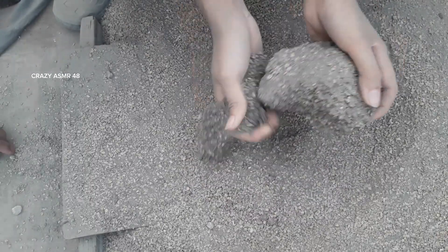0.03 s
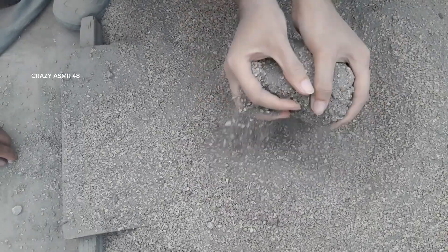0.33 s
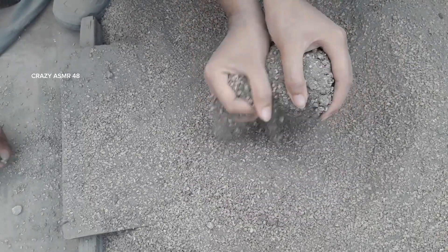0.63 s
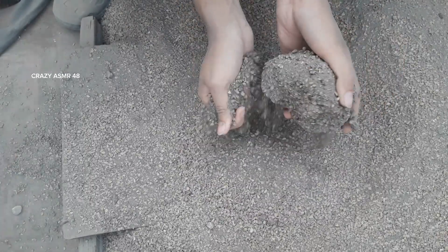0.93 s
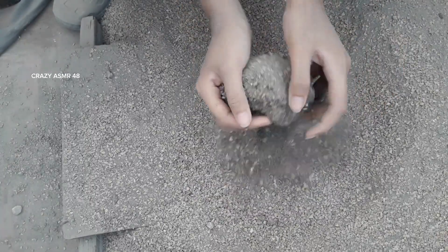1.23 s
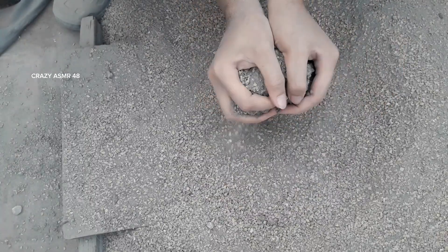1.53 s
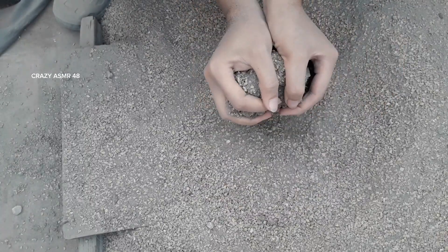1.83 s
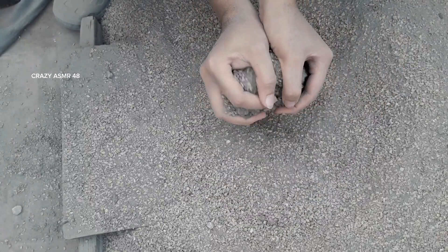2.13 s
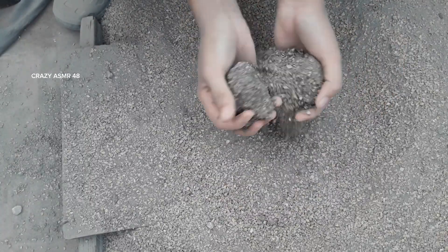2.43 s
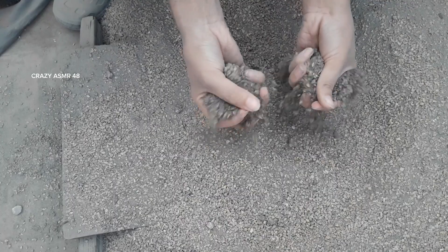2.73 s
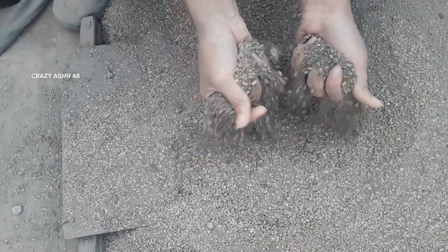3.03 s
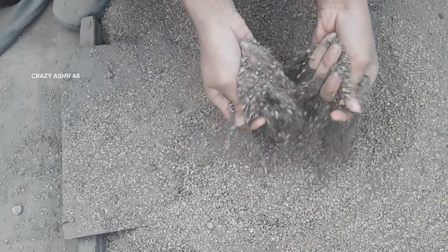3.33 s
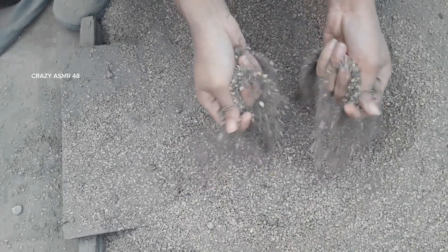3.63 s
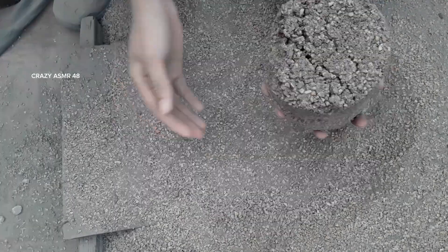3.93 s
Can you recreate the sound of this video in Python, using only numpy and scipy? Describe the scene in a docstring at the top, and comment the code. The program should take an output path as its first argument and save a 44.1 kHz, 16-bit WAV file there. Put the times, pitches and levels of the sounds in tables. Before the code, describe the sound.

A lump of dry sand crunches and snaps between two hands, close up. It gives with a few hollow knocks, then is ground down in the fists as grains trickle onto sand, over a faint low hum.

```python
"""A gritty snap, close up: two hands break and crumble a lump of dry sand.
Bonds between grains snap in bright runs, the lump gives with hollow knocks inside the closed palms,
then the fists grind it down. Loose grains trickle onto a sand bed and fine dust sizzles.
The sand cuts off just before the end; a low machine hum and faint hiss go on."""
import sys
import numpy as np
from scipy import signal
from scipy.fft import rfft, irfft
from scipy.io import wavfile

SR = 44100
rng = np.random.default_rng(int(sys.argv[2]) if len(sys.argv) > 2 else 0)


def inscribe(sig):
    """Save sig as 16-bit PCM at rate SR to the path in sys.argv[1].

    A 1-D sig is mono; a 2-D sig holds one channel per row.
    Samples are clipped to [-1, 1] before scaling.
    """
    pcm = np.round(np.clip(np.atleast_2d(sig).T, -1, 1) * 32767)
    wavfile.write(sys.argv[1], SR, pcm.astype(np.int16))


N = 176400
T = np.arange(N) / SR


def amp(db):
    """Decibels to gain."""
    return 10 ** (np.asarray(db) / 20)


def unit(x):
    """Scale to rms 1."""
    return x / np.sqrt(np.mean(x ** 2) + 1e-20)


def add(mix, start_s, sound):
    """Mix a sound in at start_s."""
    part = mix[round(start_s * SR):][:len(sound)]
    part += sound[:len(part)]


def drift(hz):
    """Smooth random motion up to about hz, rms 1."""
    rolloff = 1 + (np.fft.rfftfreq(N, 1 / SR) / hz) ** 4
    return unit(irfft(rfft(rng.standard_normal(N)) / rolloff, N))


def colour(x, points, size=4096):
    """Minimum-phase filter of unit energy; points set the spectral shape."""
    hz, db = np.transpose(points)
    bins_hz = abs(np.fft.fftfreq(size, 1 / SR))
    log_gain = np.log(amp(np.interp(np.log(bins_hz + 1), np.log(hz), db)))
    response = np.exp(np.conj(signal.hilbert(log_gain)))
    taps = np.fft.ifft(response).real[:size // 2]
    return signal.oaconvolve(x, taps / np.linalg.norm(taps))[:N]


def contour(points):
    """Gain curve through (time, dB) points."""
    return amp(np.interp(T, *np.transpose(points)))


def effort(strokes, fall_db):
    """Power-summed envelope of strokes that rise, hold, then lose fall_db per release time."""
    power = np.zeros(N)
    for start, rise, hold, release, db in strokes:
        attack = np.clip((T - start) / rise, 0, 1)
        released_s = np.maximum(T - start - rise - hold, 0)
        power += (amp(db - fall_db * released_s / release) * attack) ** 2
    return np.sqrt(power)


def grains(per_s, spread_db, clump_db, clump_hz, dust):
    """Clicks of uneven size over a share of fine dust, swelling in clumps; rms 1."""
    size = amp(spread_db * np.minimum(rng.exponential(1, N), 4))
    clicks = unit(size * rng.choice([-1, 1], N) * (rng.random(N) < per_s / SR))
    grit = clicks + dust * rng.standard_normal(N)
    clumps = amp(clump_db * np.clip(drift(clump_hz), -2, 2))
    return unit(grit * clumps)


def scatter(x, t60_s, wet_db):
    """Each grain sheds a short hiss of finer particles."""
    decay = amp(-60 * T[:SR // 10] / t60_s) ** 2
    tail_power = abs(signal.oaconvolve(x ** 2, decay / decay.sum())[:N])
    tail = np.sqrt(tail_power) * rng.standard_normal(N)
    return (x + amp(wet_db) * tail) / np.hypot(1, amp(wet_db))


# fist squeezes: t/s, rise/s, hold/s, release/s, level/dB
SQUEEZES = [(.05, 0.011, .01, 0.088, -31.5), (.49, 0.036, 0.017, 0.14, -26),
            (.765, 0.049, 0.089, 0.072, -18), (2.118, 0.02, 0.005, 0.086, -20),
            (2.24, 0.022, .03, .08, -32.5), (2.55, 0.17, 0.031, 0.072, -27),
            (2.70, 0.069, 0.031, 0.22, -17.5), (2.84, 0.048, 0.077, 0.077, -19.5),
            (2.95, 0.056, 0.066, 0.14, -16), (3.24, 0.076, 0.076, 0.16, -17),
            (3.55, 0.064, 0.056, 0.083, -21), (3.83, 0.08, 0.022, 0.03, -34.5)]
# crushed grit spectrum: f/Hz, level/dB
CRUSH_COLOUR = [(100, -32), (300, -8), (430, -12), (540, -7), (720, -4), (980, 1.5), (1300, -2.5),
                (1780, -3.5), (2400, -6.5), (3450, -7.5), (4500, -10.5), (7000, -9.5), (8600, -29),
                (16000, -19)]

def crushing():
    """Grains grind in the fists, dulled by the fingers."""
    grit = grains(per_s=1500, spread_db=1.5, clump_db=1.0, clump_hz=60, dust=0.59)
    squeezed = grit * effort(SQUEEZES, fall_db=16.5)
    return colour(scatter(squeezed, t60_s=0.055, wet_db=-6.5), CRUSH_COLOUR)


# brittle fractures: t/s, rise/s, hold/s, release/s, level/dB
FRACTURES = [(.055, 0.017, 0.022, 0.074, -20), (.497, .02, 0.015, 0.033, -16),
             (.78, 0.022, .04, 0.048, -24), (1.085, 0.0052, 0.0063, 0.02, -12),
             (2.118, 0.017, .018, .025, -21), (2.242, 0.0055, 0.038, 0.034, -28),
             (2.59, 0.022, 0.12, 0.044, -24), (2.706, 0.0094, 0.0099, 0.021, -12),
             (2.74, 0.0052, 0.074, 0.036, -13), (2.835, 0.006, 0.058, 0.072, -16),
             (2.91, .02, 0.11, 0.056, -20.5), (3.27, 0.034, 0.02, 0.084, -27),
             (3.83, 0.18, 0.015, .02, -17)]
# snap spectrum: f/Hz, level/dB
FRACTURE_COLOUR = [(200, -31), (800, -9), (1800, -5.5), (2500, -3), (3500, -0.5), (4600, -0.5), (5800, 1),
                   (7200, 1), (8600, -18), (11000, -15), (15500, -5)]

def fractures():
    """Bonds between grains snap in dense bright runs."""
    grit = grains(per_s=4400, spread_db=1.5, clump_db=-2, clump_hz=90, dust=0.67)
    snaps = grit * effort(FRACTURES, fall_db=17.5)
    return colour(scatter(snaps, t60_s=0.018, wet_db=-10.5), FRACTURE_COLOUR)


# slips of the lump: t/s, level/dB
KNOCKS = [(1.368, -35), (1.387, -16.5), (1.396, -23), (1.401, -11), (1.4067, -10.5), (1.445, -22.5),
          (1.4907, -6.5), (1.498, -22), (1.503, -10.5), (1.523, -19), (1.536, -18.5), (1.556, -21.5),
          (2.893, -13.5)]
# air pocket between the palms: f/Hz, level/dB, t60/s
PALM_MODES = [(538, 0, 0.047), (820, -6.5, 0.044), (1106, -5.5, 0.053), (1220, -14, 0.033),
              (1670, -17.5, 0.033), (2720, -15, 0.01)]

def knocks(crack_db=-13.5, crack_tau_s=0.0046, highpass_hz=465):
    """Each slip cracks and rings the air between the palms, whose shape differs from knock to knock."""
    out, t = np.zeros(N), T[:SR // 8]
    for start, db in KNOCKS:
        detune = 1 + 0.025 * rng.standard_normal(len(PALM_MODES))
        ring = sum(amp(mode_db - 60 * t / t60) * np.sin(2 * np.pi * hz * ratio * t)
                   for (hz, mode_db, t60), ratio in zip(PALM_MODES, detune))
        noise = unit(colour(rng.standard_normal(len(t)), CRUSH_COLOUR)[:len(t)])
        crack = amp(crack_db) * np.exp(-t / crack_tau_s) * noise
        add(out, start, amp(db) * (ring + crack))
    return signal.sosfilt(signal.butter(6, highpass_hz, "high", fs=SR, output="sos"), out)


# flow of coarse grains and of fine dust: t/s, level/dB
GRAIN_FLOW = [(0, -32), (.2, -25.5), (.46, -27), (.60, -27), (.70, -31), (.85, -31), (1.0, -31),
              (1.14, -29.5), (1.3, -26.5), (1.46, -31), (1.6, -31.5), (1.75, -38), (1.86, -40),
              (2.05, -36.5), (2.22, -41.5), (2.3, -33), (2.42, -35), (2.62, -28), (2.8, -37), (3.2, -31.5),
              (3.38, -23.5), (3.65, -42), (3.79, -33), (3.9, -25)]
DUST_FLOW = [(0, -26.5), (.24, -20.5), (.46, -27), (.65, -27.5), (.85, -27.5), (1.02, -26.5), (1.13, -24),
             (1.27, -22), (1.43, -30), (1.6, -29.5), (1.84, -38.5), (2.05, -37), (2.23, -40),
             (2.255, -25.5), (2.41, -32), (2.62, -22.5), (2.68, -26), (2.75, -28), (2.95, -32),
             (3.2, -24.5), (3.38, -22), (3.8, -24), (3.9, -19)]
# their spectra: f/Hz, level/dB
GRAIN_COLOUR = [(200, -17), (700, -7.5), (1400, -3.5), (2400, -5), (3500, -1), (4300, 2.5), (5600, 3.5),
                (7200, 5.5), (8700, -15.5), (11000, -23), (15600, -9)]
DUST_COLOUR = [(100, -60), (6000, -40), (8800, -16), (10500, -11.5), (12200, -7), (13800, -4.5), (15200, 0),
               (16000, 1)]

def trickle():
    """Loose grains patter on the sand bed and fine dust sizzles, in the same spurts."""
    spurts = amp(1.2 * drift(hz=24))
    coarse = grains(per_s=2500, spread_db=2.0, clump_db=0.5, clump_hz=70, dust=0.26)
    coarse = scatter(coarse, t60_s=0.029, wet_db=-2)
    fine = grains(per_s=5200, spread_db=2.0, clump_db=2.0, clump_hz=130, dust=0.47)
    patter = colour(coarse * spurts * contour(GRAIN_FLOW), GRAIN_COLOUR)
    sizzle = colour(fine * spurts * contour(DUST_FLOW), DUST_COLOUR)
    return patter + sizzle


# single grain cracks: t/s, level/dB
TICKS = [(1.591, -27), (1.595, -21), (1.623, -21), (1.665, -24), (1.694, -24), (1.70, -24), (1.714, -24),
         (1.744, -29), (1.769, -21), (1.816, -31), (1.884, -27), (1.963, -29), (2.061, -23), (2.783, -17),
         (2.882, -13)]
# tick spectrum: f/Hz, level/dB
TICK_COLOUR = [(300, -10), (2500, -10), (4500, 3), (7200, 8.5), (8700, -13), (12000, -8.5), (15500, -2.5)]

def ticks(tau_s=0.0033):
    """Coarse grains split under pressure, each a brief noise burst."""
    out, t = np.zeros(N), T[:SR // 30]
    for start, db in TICKS:
        add(out, start, amp(db) * np.exp(-t / tau_s) * rng.standard_normal(len(t)))
    return colour(out, TICK_COLOUR)


# grit in the opening fists; two halves scraping apart: t/s, rise/s, hold/s, release/s, level/dB
FIST_RINGS = [(2.56, 0.17, 0.345, 0.1, -26.5), (3.26, 0.041, 0.035, 0.18, -29)]
SCRAPES = [(2.24, 0.0051, .135, .02, -31.5)]

def hollow_ring(strokes, hz, half_width_hz):
    """Sliding grit excites one narrow air resonance between the fingers."""
    grit = grains(per_s=1400, spread_db=3.0, clump_db=1.2, clump_hz=50, dust=0.23)
    b, a = signal.iirpeak(hz, hz / half_width_hz / 2, SR)
    ring = signal.lfilter(b, a, signal.lfilter(b, a, grit))
    return unit(ring) * effort(strokes, fall_db=24)


# rubbing in the palms: t/s, level/dB
RUB_LEVELS = [(0, -34.5), (.1, -32.5), (.35, -33), (.46, -40.5), (.62, -32.5), (1.0, -35), (1.2, -34),
              (1.33, -33.5), (1.55, -31.5), (1.62, -38.5), (2.22, -42), (2.27, -35), (2.41, -38.5),
              (3.2, -39.5), (3.65, -32.5), (3.9, -38.5)]
# rub spectrum: f/Hz, level/dB
RUB_COLOUR = [(150, -15), (400, -14), (520, -2), (600, -3), (690, -0.5), (800, -7), (980, -12),
              (1180, -8.5), (1500, -18.5), (3000, -15.5), (8000, -63)]

def rubbing():
    """The lump shifts against the skin with a dull rasp."""
    grit = grains(per_s=700, spread_db=0.5, clump_db=3.5, clump_hz=29.4, dust=0.5)
    return colour(grit * contour(RUB_LEVELS), RUB_COLOUR)


# hum partials: f/Hz, level/dB, waver/ratio
HUM_PARTIALS = [(78.2, -36.5, 0.25), (159.5, -44.5, 0.97), (232.5, -49.5, 0.56)]

def machine_hum():
    """Low machine tones, each wavering in level and phase."""
    hum = np.zeros(N)
    for hz, db, waver in HUM_PARTIALS:
        wobble = 1 + waver * (drift(hz=2.5) + 1j * drift(hz=6.5)) / np.sqrt(2)
        tone = np.exp(2j * np.pi * (hz * T + rng.random()))
        hum += amp(db) * np.sqrt(2) * (wobble * tone).real
    return hum


# room noise spectrum: f/Hz, level/dB
ROOM_COLOUR = [(20, -43), (32, -29), (46, -26), (62, -14), (88, -12), (100, 4), (122, -9), (175, -9),
               (210, -12.5), (380, -19), (520, -21.5), (670, -16), (950, -26), (1500, -35.5), (4000, -42.5),
               (7000, -43.5), (9000, -63), (16000, -43)]

def room_noise(rms_db=-32.5):
    """Steady rumble and faint hiss."""
    return amp(rms_db) * unit(colour(rng.standard_normal(N), ROOM_COLOUR))


# resonances of the space around the hands: f/Hz, level/dB
HAND_SPACE = [(100, -3), (420, -3), (540, 0), (680, 3), (850, 0), (1200, 1), (1480, -4), (1630, -1),
              (1760, 6), (1900, 1), (2120, -5), (2320, 0), (2490, -3), (2750, 1), (3130, -4), (3400, 3),
              (4300, -1), (5000, 0), (16000, 0)]

def scene(cut_s=3.918):
    """Mono mix; all sand sounds stop at cut_s, the background goes on."""
    grit = crushing() + fractures() + trickle() + ticks() + rubbing()
    sand = colour(grit, HAND_SPACE) + knocks()
    sand += hollow_ring(FIST_RINGS, hz=1757, half_width_hz=170)
    sand += hollow_ring(SCRAPES, hz=696, half_width_hz=82)
    gate = np.clip((cut_s - T) / 0.002, 0, 1)
    return (sand * gate + machine_hum() + room_noise())[None]


def record(dry):
    """Soft overload on the highest peaks, then a steep low-pass."""
    cutoff_hz = 15780
    soft = dry / (1 + dry ** 4) ** 0.25
    lowpass = signal.firwin(1023, cutoff_hz, window=("kaiser", 9), fs=SR)
    return signal.oaconvolve(soft, lowpass[None], "same")


dry = scene()
out = record(dry)
inscribe(out)
```